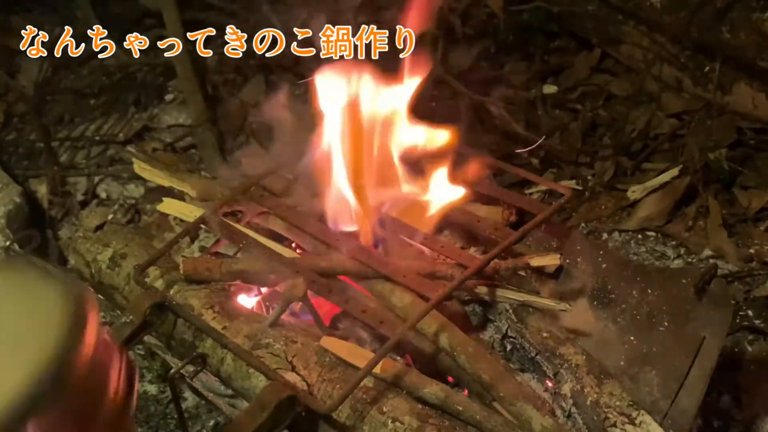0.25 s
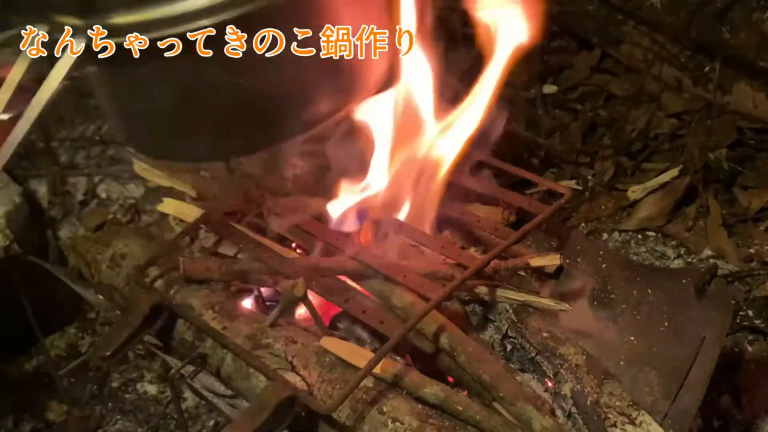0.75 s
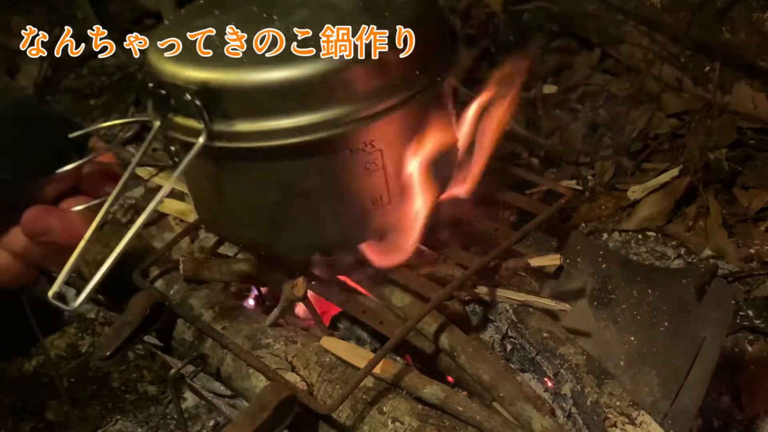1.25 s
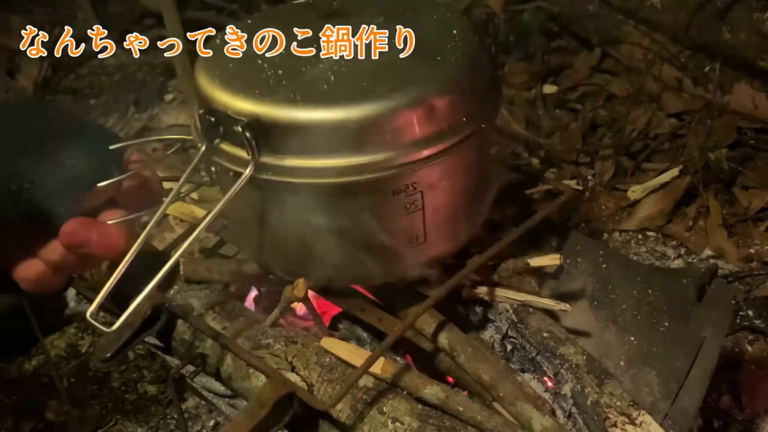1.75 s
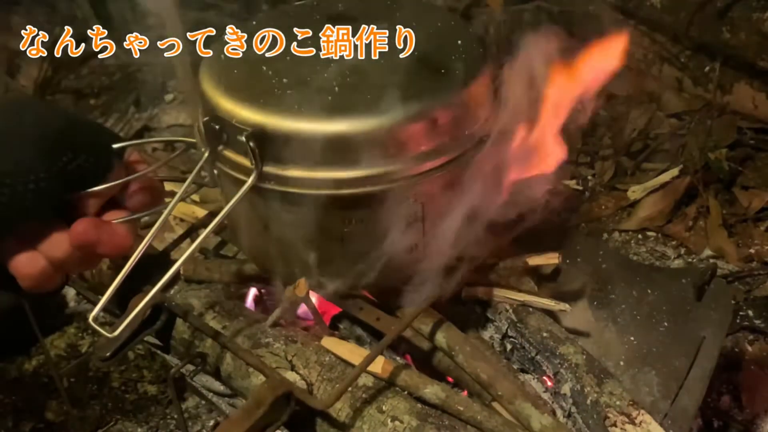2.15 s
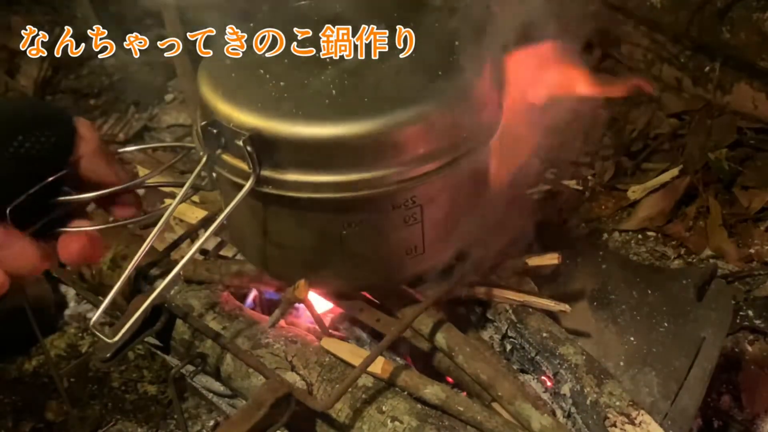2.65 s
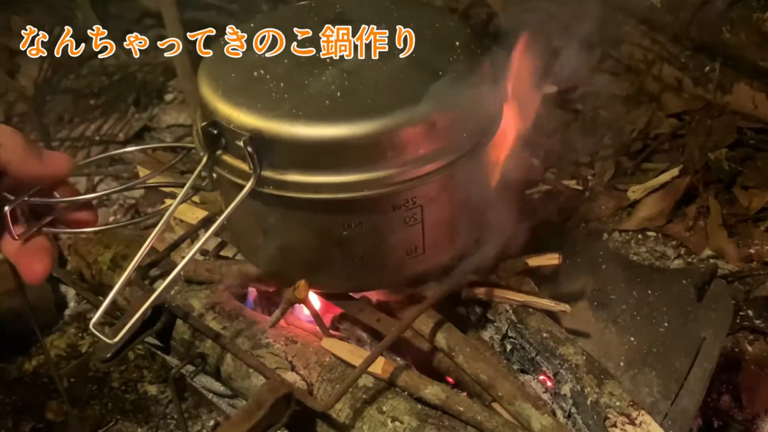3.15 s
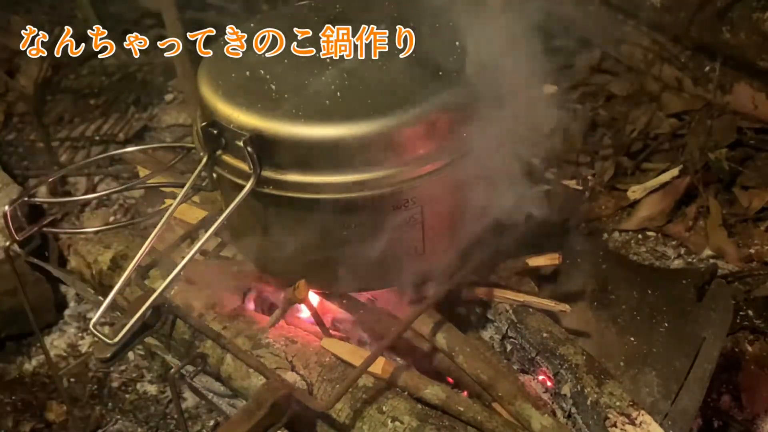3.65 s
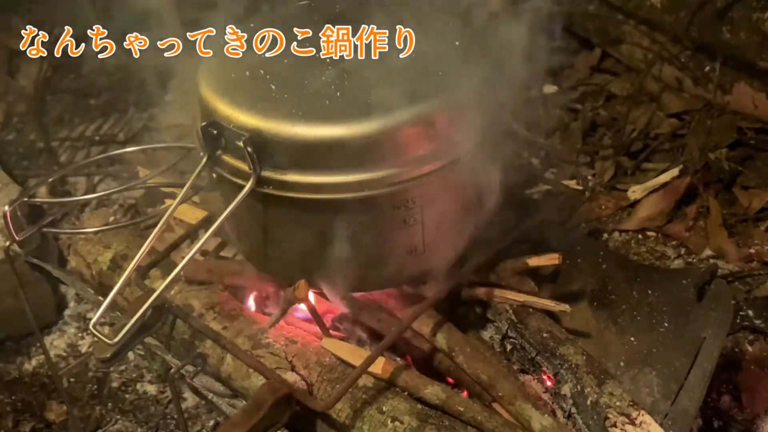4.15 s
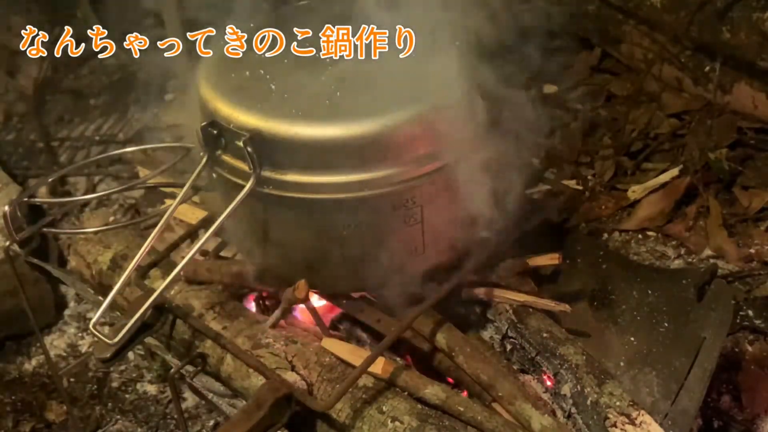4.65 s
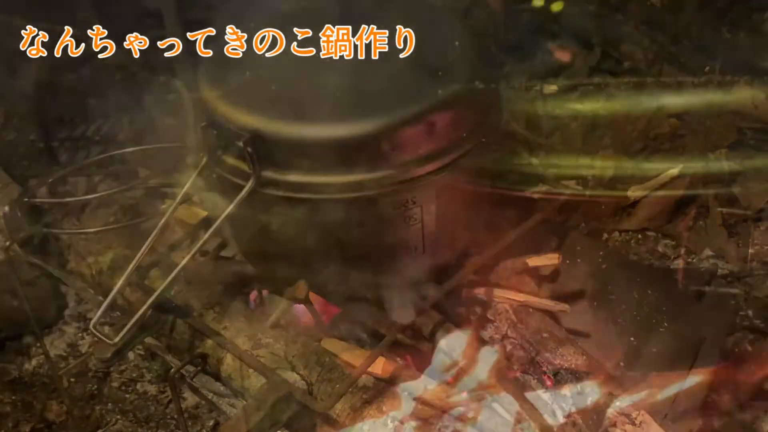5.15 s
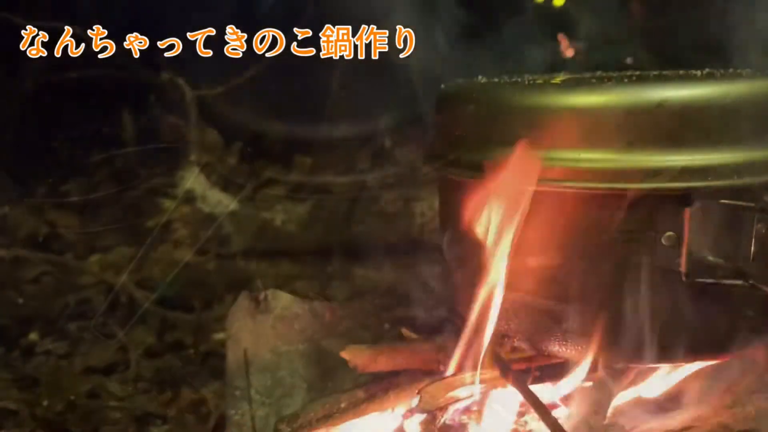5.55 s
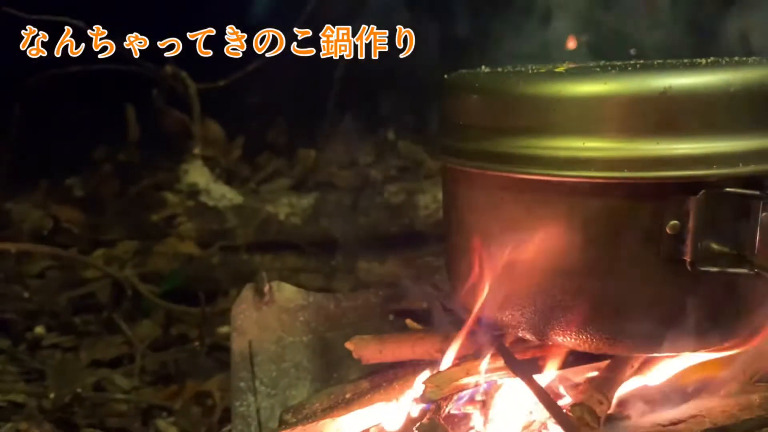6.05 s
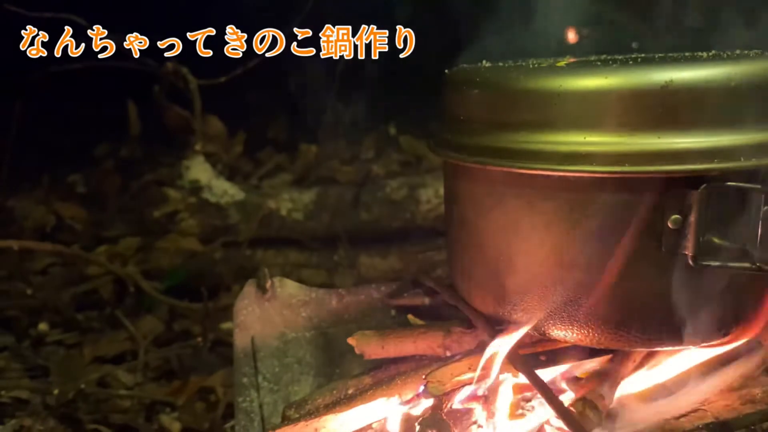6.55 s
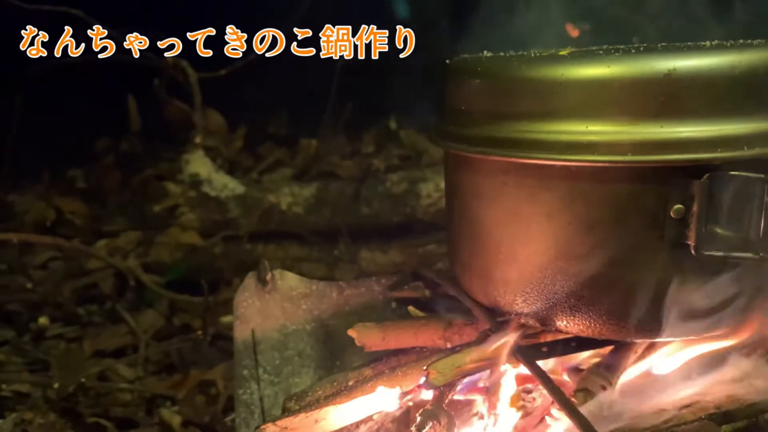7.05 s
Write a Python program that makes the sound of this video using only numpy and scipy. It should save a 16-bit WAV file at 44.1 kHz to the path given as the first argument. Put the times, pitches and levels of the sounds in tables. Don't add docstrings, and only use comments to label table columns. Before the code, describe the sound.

Outdoors at night, a small wood fire flutters low with sharp ember snaps, loudest at the very start. A metal pot touches the grate lightly, then settles with a short ring near two seconds. Crickets trill throughout over a faint stream on the left. Around five seconds wood knocks and the sound dissolves closer, with more sap hiss and another hard crack. Heard in stereo by a spaced microphone pair.

```python
import sys
import numpy as np
from scipy import signal
from scipy.fft import rfft, irfft
from scipy.io import wavfile
from scipy.ndimage import uniform_filter1d

SR = 44100
rng = np.random.default_rng(int(sys.argv[2]) if len(sys.argv) > 2 else 0)


def store_wav(level_fs):
    pcm = np.round(np.clip(np.atleast_2d(level_fs), -1, 1) * 32767)
    wavfile.write(sys.argv[1], SR, pcm.T.astype(np.int16))


def linear_from_db(decibels):
    return 10 ** (np.asarray(decibels, float) / 20)


N = 321930

FIRE_LAG, STREAM_LAG, BODY_LAG = 10.25, -20, -2


def evened(x):
    return x / np.sqrt(np.mean(x ** 2) + 1e-20)


def read(points, hz):
    f, value = np.transpose(points)
    return np.interp(np.log(hz + 1), np.log(f + 1), value)


def level(rows, axis=1):
    return linear_from_db(np.interp(np.arange(N) / SR, *np.transpose(rows)[[0, axis]]))


def add(mix, s, sound, pan_db, lag):
    for side, late in ((0, max(lag, 0)), (1, max(-lag, 0))):
        at = round(s * SR + late)
        part = mix[side, max(at, 0):][:max(len(sound) + min(at, 0), 0)]
        part += linear_from_db(pan_db * (.5 - side)) * sound[max(-at, 0):][:len(part)]


def noise(colour, same, lag, patchy_db, flicker_db, size):
    hz = np.fft.rfftfreq(size, 1 / SR)
    frames = 4 * N // size + 5
    a, b, c, d, patches = rng.standard_normal((frames, len(hz), 5)).T
    patches = uniform_filter1d(patches, size=8, axis=0)
    patches = evened(uniform_filter1d(patches, size=12, axis=1))
    flicker = evened(uniform_filter1d(rng.standard_normal(frames), size=3))
    same = np.clip(same * np.ones(len(hz)), 0, 1)[:, None]
    right = a + 1j * b
    delay = np.exp(-2j * np.pi * hz * lag / SR)[:, None]
    left = same * right * delay + np.sqrt(1 - same ** 2) * (c + 1j * d)
    gain_db = read(colour, hz)[:, None] + patchy_db * patches + flicker_db * flicker
    z = np.array([left, right]) * linear_from_db(gain_db)
    return evened(signal.istft(z, nperseg=size, noverlap=size - size // 4)[1][:, :N])


def band(x, lo_hz, hi_hz):
    sos = signal.butter(2, [lo_hz, min(hi_hz, 20000)], "band", fs=SR, output="sos")
    return signal.sosfilt(sos, x)


def fire_lag(hz):
    housing_turn_rad = 1.2
    return FIRE_LAG - housing_turn_rad * SR / (2 * np.pi * np.maximum(hz, 1000))


# (start [s], end [s])
DISSOLVE_S = (4.9, 5.65)


def spots(far_db, close_db):
    close = np.interp(np.arange(N) / SR, DISSOLVE_S, [0, 1])
    return np.hypot((1 - close) * linear_from_db(far_db), close * linear_from_db(close_db))


# (middle [s], half length [s], hiss [dB], roar [dB])
FLARES = [(0.067, 0.086, -59, -56.5), (1.197, 0.23, -92, -58.5), (1.904, 0.17, -77, -58.5),
          (3.67, 0.15, -70.5, -62.5), (4.2, 0.21, -71.5, -62.5), (4.492, 0.087, -59.5, -58.5),
          (5.057, 0.056, -82, -57), (5.303, 0.48, -72, -58), (5.577, 0.18, -65, -53),
          (6.33, 0.27, -66, -76), (6.776, 0.16, -68.5, -52), (7.04, 0.064, -71, -52)]


def flaring(steady, axis):
    t = np.arange(N) / SR
    power = steady ** 2
    for row in FLARES:
        power = power + linear_from_db(2 * row[axis]) * np.exp(-((t - row[0]) / row[1]) ** 2)
    return np.sqrt(power)


def leaves(x, t60):
    t = np.arange(round(.3 * SR)) / SR
    tail = rng.standard_normal((2, len(t))) * linear_from_db(-60 * t / t60)
    return signal.fftconvolve(x, tail / np.linalg.norm(tail[0]), axes=1)[:, :N]


# (time [s], vigour [dB], size as lean to deep puffing [dB])
FLAME = [(0, -45, 3.5), (.1, -42, -5), (.2, -46.5, 2), (.9, -44.5, -0.5), (1.6, -50, -3), (2.4, -47, -3),
         (2.62, -44.5, -0.5), (2.84, -42.5, -0.5), (3.2, -46.5, 1), (3.56, -43.5, -1), (3.85, -49.5, -2),
         (4.45, -47, 0.5), (5.25, -53, 0.9), (5.9, -46.5, 1.5), (6.3, -46, 1.5), (6.47, -55, -2),
         (6.78, -52, -5), (7.3, -49.5, -3)]
# (frequency [Hz], density [dB per Hz])
PUFF = [(20, -57), (40, 18.5), (55, 18), (80, 23), (100, 3), (140, -41.5)]
FLUTTER = [(55, -31), (85, -10), (110, 2), (170, -1.5), (220, -13.5), (300, -34), (500, -98)]
ROAR = [(120, -37), (200, 1.5), (240, 8.5), (330, 3), (420, 0), (700, -44)]


def flames():
    vigour, size = level(FLAME), level(FLAME, axis=2)
    puff = linear_from_db(-4) * vigour * size * noise(PUFF, .985, 0, 1.5, 1.2, size=4096)
    flutter = linear_from_db(-2.5) * vigour / size * noise(FLUTTER, 0.85, 0, 0.7, 2.6, size=2048)
    roar = flaring(spots(-60, -53.5), axis=3) * noise(ROAR, 0.22, 0, 1.7, 1.74, size=1024)
    return (puff + flutter) * linear_from_db([[-.6], [.6]]) + linear_from_db(-2.0) * roar


# (frequency [Hz], density [dB per Hz])
WASH = [(120, -12), (300, -9.5), (600, -0.5), (1200, 1), (2500, -5.5), (3600, -7.5), (5300, -11.5),
        (7500, -19), (10000, -25.5), (13500, -23.5), (15200, -10), (16000, -14)]
# (frequency [Hz], left-right likeness [0-1])
WASH_SAME = [(200, 0.086), (500, 0.32), (2000, 0.11), (5000, 0.038), (7000, 0.089), (9000, 1)]


def stream():
    hz = np.fft.rfftfreq(512, 1 / SR)
    lag = np.where(hz < 5500, STREAM_LAG, fire_lag(hz))
    wash = noise(WASH, read(WASH_SAME, hz), lag, 1.15, 0.3, size=512)
    return linear_from_db(3.5) * spots(-52, -52.5) * wash


# (frequency [Hz], density [dB per Hz])
SAP = [(2000, 1), (5000, 2.5), (6200, 1.5), (7200, 9.5), (8300, 12), (9300, 3.5), (11500, 6.5), (13500, 8),
       (15000, -14), (16000, -20)]


def sizzle():
    hiss = noise(SAP, 1.0, fire_lag(np.fft.rfftfreq(256, 1 / SR)), 2.8, 0.23, size=256)
    ticks_per_s = 250
    ticks = linear_from_db(6 * np.minimum(rng.exponential(1, N), 3))
    ticks = ticks * (rng.random(N) < ticks_per_s / SR) * rng.choice([-1, 1], N)
    ticks = band(band(ticks, 6500, 14000), 6500, 14000)
    ticks = linear_from_db(-11) * evened(ticks)
    ticks = np.array([np.roll(ticks, int(FIRE_LAG)), ticks])
    return linear_from_db(8.5) * flaring(spots(-82, -73), axis=2) * (hiss + ticks)


def trills(rows, uneven_db, stroke_s, sag_hz_per_s, swell_db, climb_strokes):
    out, t = np.zeros((2, N)), np.arange(-.024, .024, 1 / SR)
    bell = np.exp(-.5 * (t / stroke_s) ** 2)
    lucks = rng.standard_normal((len(rows), 3, 20))
    for (first, last, top_hz, climb_hz, db, pan_db), luck in zip(rows, lucks):
        times = np.linspace(first, last, round((last - first) / .048) + 1)
        for k, s in enumerate(times):
            hz = top_hz - climb_hz * np.exp(-k / climb_strokes) + 8 * luck[0, k]
            hz = hz - sag_hz_per_s * t
            stroke_db = db - swell_db * np.exp(-k / 0.73) + uneven_db * luck[1, k]
            tone = linear_from_db(stroke_db) * bell * np.sin(2 * np.pi * np.cumsum(hz) / SR)
            add(out, s + t[0], tone, pan_db + 0.59 * luck[2, k], 0)
    return out


# (frequency [Hz], density [dB per Hz])
FAR = [(3700, -27), (4050, -12.5), (4200, -6.5), (4300, -9), (4400, -11), (4600, -22), (4900, -18),
       (5200, -61)]


def chorus():
    start, length, pitch, high, pan = rng.random((168, 5)).T
    start = 7.8 * (np.arange(len(start)) + start) / len(start) - .5
    end = start + 0.18 + 0.21 * length
    higher = high > .87
    hz = 4170 + 170 * pitch + 280 * higher
    rows = list(zip(start, end, hz, 80 + 0 * hz, -11. * higher, 8 * pan - 4))
    far = sum(leaves(trills(rows[k::4], 3.5, .0045, 2000, 0, 1.5), .15) for k in range(4))
    shimmer = noise(FAR, 0.2, 0, 2.3, 0.44, size=1024)
    return spots(-60, -62.5) * (linear_from_db(4.0) * evened(far) + linear_from_db(3.0) * shimmer)


def strokes(rows, stroke_s, sag_hz_per_s, pan_db, lag):
    out, t = np.zeros((2, N)), np.arange(-.024, .024, 1 / SR)
    for (s, hz, db), luck in zip(rows, rng.standard_normal((len(rows), 2))):
        bell = np.exp(-.5 * (t / (stroke_s * linear_from_db(1.3 * luck[0]))) ** 2)
        tone = np.sin(2 * np.pi * np.cumsum(hz - sag_hz_per_s * t) / SR)
        add(out, s + t[0], linear_from_db(db) * bell * tone, pan_db + 1.5 * luck[1], lag)
    return out


# (time [s], pitch [Hz], peak [dB])
FAR_STROKES = [(0.023, 4300, -42), (0.107, 4320, -45), (0.176, 4350, -50), (0.372, 4240, -43),
               (0.462, 4280, -39), (0.51, 4290, -43), (0.559, 4300, -43), (0.61, 4240, -44),
               (0.631, 4260, -48), (0.667, 4320, -46), (0.776, 4230, -56), (0.829, 4200, -52),
               (0.964, 4230, -46), (1.019, 4240, -42), (1.06, 4290, -48), (1.117, 4280, -45),
               (1.165, 4280, -43), (1.22, 4280, -41), (1.243, 4240, -52), (1.287, 4200, -50),
               (1.582, 4270, -46.5), (1.629, 4316, -39), (1.679, 4260, -46), (1.732, 4290, -42.5),
               (1.777, 4310, -40), (2.12, 4240, -49), (2.193, 4200, -46), (2.222, 4300, -42),
               (2.275, 4300, -42), (2.325, 4290, -46), (2.624, 4180, -47), (2.663, 4250, -47),
               (2.721, 4250, -40.5), (2.77, 4260, -41.5), (2.818, 4260, -42), (2.867, 4190, -48),
               (2.911, 4290, -42.5), (3.246, 4220, -47), (3.3, 4270, -43), (3.349, 4300, -40.5),
               (3.393, 4260, -43), (3.45, 4270, -46), (3.615, 4300, -46), (3.697, 4290, -45.5),
               (3.739, 4250, -49.5), (3.819, 4230, -45.5), (3.847, 4260, -44), (3.883, 4300, -42),
               (3.934, 4290, -45), (3.979, 4310, -45.5), (4.363, 4270, -42.5), (4.41, 4290, -45.5),
               (4.463, 4290, -43), (4.51, 4300, -42), (4.635, 4320, -47), (4.752, 4270, -48),
               (4.796, 4260, -48), (4.901, 4290, -45), (4.948, 4240, -47), (4.99, 4270, -49)]
CLOSE_STROKES = [(5.122, 4200, -54), (5.391, 4320, -53), (5.442, 4290, -46), (5.487, 4430, -51),
                 (5.53, 4300, -49), (5.546, 4140, -54), (5.58, 4400, -55), (5.626, 4360, -50),
                 (5.672, 4420, -50), (5.717, 4250, -48), (5.771, 4280, -48), (5.815, 4270, -50),
                 (5.857, 4400, -48), (5.877, 4400, -60), (5.902, 4430, -45), (5.95, 4380, -51),
                 (5.998, 4360, -45), (6.042, 4180, -52), (6.258, 4220, -44), (6.306, 4200, -49),
                 (6.355, 4290, -49), (6.393, 4340, -45), (6.473, 4160, -51), (6.492, 4320, -43),
                 (6.535, 4400, -46), (6.579, 4400, -51), (6.632, 4280, -43), (6.681, 4280, -49),
                 (6.697, 4130, -52), (6.717, 4160, -51), (6.719, 4380, -54), (6.76, 4220, -51),
                 (6.814, 4200, -50), (6.9, 4160, -55), (6.957, 4310, -45), (6.976, 4160, -53),
                 (7.007, 4280, -47), (7.054, 4260, -49), (7.097, 4380, -48), (7.143, 4370, -48),
                 (7.188, 4400, -44), (7.24, 4350, -49), (7.253, 4160, -57), (7.281, 4350, -50)]


def near_crickets():
    far = strokes(FAR_STROKES, .007, 1500, -4, lag=-1)
    close = strokes(CLOSE_STROKES, .008, 2500, 3, lag=4)
    return linear_from_db(-1.5) * (far + close)


# (time [s], peak [dB], pitch [Hz], left-right [dB])
RINGS = [
    (.024, -46, 567, 5),
    (.132, -44, 585, 6),
    (.21, -43.5, 553, 6),
    (1.42, -46, 1700, -1),
    (1.919, -35.5, 572, 4),
    (1.92, -42, 657, -5),
    (1.917, -46, 790, 3),
]
# (time [s], peak [dB], first pitch [Hz], t60 [s], left-right [dB])
TAPS = [
    (.058, -33, 1050, 0.019, 16),
    (1.744, -35, 1490, .028, 3),
    (3.498, -41, 4400, 0.054, -3),
    (3.924, -37, 298, 0.034, -10),
    (4.9615, -30, 750, .03, 8),
]
# (time [s], peak [dB], first pitch [Hz], t60 [s], left-right [dB])
THUDS = [
    (.09, -38, 213, 0.16, 0),
    (5.422, -46, 400, 0.032, -3),
]
# (time [s], peak [dB], first pitch [Hz], last pitch [Hz], t60 [s], left-right [dB])
SLOSH = (1.95, -44, 774, 1300, .36, 4)


def knocks():
    out = np.zeros((2, N))
    ring_t60_s = 0.074
    rows = [(s, db, hz, hz, ring_t60_s, pan_db) for s, db, hz, pan_db in RINGS] + [SLOSH]
    for hits, fall in ((TAPS, 0.803), (THUDS, 0.484)):
        rows += [(s, db, hz, fall * hz, t60, pan_db) for s, db, hz, t60, pan_db in hits]
    for s, db, first_hz, last_hz, t60, pan_db in rows:
        t = np.arange(round(t60 * SR)) / SR
        hz = last_hz + (first_hz - last_hz) * np.exp(-t / (0.19 * t60))
        envelope = linear_from_db(db - 60 * t / t60) * (1 - np.exp(-t / 0.002))
        add(out, s, envelope * np.sin(2 * np.pi * np.cumsum(hz) / SR), pan_db, STREAM_LAG)
    return out


# (time [s], peak [dB], body [dB], middle [dB], top [dB])
SNAPS = [(.0258, -29, -19, -18, 1), (.0874, 2.5, -7.5, -5.5, -10), (.088, -9, -20, 2, -16),
         (0.109, -27, -20, -8, 0), (0.2155, -31, -14, 4.5, 6), (.3601, -15, -22, -10.5, -1),
         (1.245, -44, -14, -4, 13), (1.3712, -31.5, -14, 0, -12), (1.7565, -32, -14, -8, 0),
         (1.761, -23.5, -11, -1, 1), (1.8028, -37, -14, -8, 0), (1.912, -37, -14, 0, 3),
         (2.627, -38, -14, 4, 1), (2.913, -33.5, -14, 6, 4), (3.6093, -27, -14, -2, -2),
         (3.7662, -34, -16, 3, -15), (4.538, -39, -14, 0, -6), (4.542, -29, -14, -1, -3),
         (4.7897, -41, -14, 2, 5), (5.421, -21.5, -4, -8, -8), (5.5338, -43, -14, -5, 0),
         (5.609, -30, -13, -5, 4), (5.658, -33, -14, -12, -1), (5.676, -35, -14, -7, 3),
         (6.0366, -35, -14, -2, 5), (6.146, -36, -14, -8, -8), (6.1773, -32, -14, -14, -8),
         (6.2347, -37, -14, -8, -3), (6.247, -36, -14, -8, -8), (6.303, -29.5, -14, -17, -7),
         (6.322, -39, -14, -8, -3), (6.4077, -35, -14, -6, -3), (6.4531, -4.5, -15, -5, -3),
         (6.6136, -16.5, -4.5, -4.5, -2), (6.7755, -31, -2, 0, 0), (6.8597, -29.5, -14, -14, -4),
         (7.2834, -23.5, -16.5, -9, -5)]
SNAP_HZ = [400, 1200, 4300, 6500, 7800, 9300, 11500, 13200, 15200, 16200, 16800]


def snaps():
    splinter, splinter_s = .4, 0.0002
    scatter, scatter_s = 0.055, 0.002
    out, t = np.zeros((2, N)), np.arange(1024) / SR - .002
    hz = np.fft.rfftfreq(len(t), 1 / SR)
    treble = np.clip((hz - 4500) / 1500, 0, 1)
    turns = treble * (hz * fire_lag(hz) / SR - 1) + (1 - treble) * hz * BODY_LAG / SR
    tear = splinter * np.exp(-abs(t) / splinter_s * np.where(t > 0, 1, 1.2))
    echo = (t > 0) * scatter * np.exp(-t / scatter_s)
    lucks = rng.standard_normal((len(SNAPS), 3, len(t)))
    for (s, db, body_db, middle_db, top_db), luck in zip(SNAPS, lucks):
        colour_db = np.interp(hz, SNAP_HZ, [
            body_db - 6, body_db, middle_db - 5, middle_db, middle_db - 1, 0, -3,
            top_db - 1, top_db, top_db - 8, -90])
        for side in (0, 1):
            click = (abs(t) == abs(t).min()) + tear * luck[2]
            click = rfft(click + echo * luck[side])
            click = click / uniform_filter1d(abs(click), size=41)
            click = click * np.exp(-2j * np.pi * turns * (1 - side))
            part = out[side, round((s - .0009) * SR):][:len(t)]
            part += linear_from_db(db + 11.5) * irfft(click * linear_from_db(colour_db))[:len(part)]
    return out


# (first stroke [s], last stroke [s], level [dB])
HIGH_TRILLS = [(.1, .152, -49), (.42, .612, -51), (1.06, 1.256, -54), (1.64, 1.83, -59), (2.195, 2.34, -49),
               (2.913, 3.04, -54), (3.62, 3.79, -52), (4.316, 4.46, -52), (5.307, 5.453, -51),
               (5.72, 5.99, -50.5), (6.171, 6.411, -48), (6.713, 6.908, -49), (7.165, 7.3, -49)]
# (top pitch [Hz], climb [Hz], left-right [dB])
HIGH_VOICE = (4885, 25, -5)


def high_cricket():
    top_hz, climb_hz, pan_db = HIGH_VOICE
    rows = [(first, last, top_hz, climb_hz, db, pan_db) for first, last, db in HIGH_TRILLS]
    return linear_from_db(-9.5) * trills(rows, 2.5, .011, 1500, 5, 1.5)


# (time [s], peak [dB], first pitch [Hz], length [s], left-right [dB])
BUMPS = [(1.743, -41, 1500, 0.0067, 0), (1.752, -41, 1200, 0.006, 1), (4.433, -39, 1900, 0.0074, 5),
         (4.502, -43, 1500, .007, 4), (4.563, -37, 1500, 0.0077, 3), (4.597, -38.5, 1050, 0.0097, -1),
         (4.9592, -24.5, 1080, 0.0099, 6.5), (4.98, -37, 302, .014, -1), (5.044, -42, 900, .009, 4),
         (5.056, -45, 1210, 0.011, 4), (5.068, -44, 1300, .007, 0), (5.081, -43, 1510, 0.0089, 2),
         (5.092, -42, 1400, 0.0091, 2), (5.095, -46, 1390, 0.0065, -10), (5.108, -44, 1110, .008, 6)]


def bumps():
    out = np.zeros((2, N))
    fall = 0.21
    for s, db, first_hz, length, pan_db in BUMPS:
        u = np.arange(round(length * SR)) / (length * SR)
        hz = first_hz * (fall + (1 - fall) * np.exp(-u / 0.15))
        envelope = -linear_from_db(db) * np.sin(np.pi * u ** 0.34) ** 0.86
        add(out, s, envelope * np.sin(2 * np.pi * np.cumsum(hz) / SR), pan_db, STREAM_LAG)
    return out


# (middle [s], half length [s], level [dB])
RUSTLES = [
    (1.75, 0.015, -47.5),
    (3.6, 0.054, -52.5),
    (4.47, 0.14, -52),
    (5.422, 0.018, -54),
]
# (frequency [Hz], density [dB per Hz])
LEAF = [(300, -3), (900, -1.5), (2200, -0.5), (3500, -7), (6000, -28), (9000, -58)]


def rustle():
    t = np.arange(N) / SR
    gain = sum(linear_from_db(db) * np.exp(-.5 * ((t - s) / half) ** 2) for s, half, db in RUSTLES)
    return gain * noise(LEAF, 0.12, 0, 3.6, 1.2, size=256)


def scene():
    edge = signal.firwin(401, 16100, fs=SR)[None]
    hiss = signal.oaconvolve(stream() + sizzle(), edge, "same", axes=1)
    high = high_cricket()
    near = near_crickets() + high
    near = near + linear_from_db(-8) * leaves(near, .15) + linear_from_db(-1) * leaves(high, .2)
    hits = knocks()
    hits = hits + linear_from_db(-3.5) * leaves(hits, 0.095)
    return flames() + hiss + chorus() + near + hits + snaps() + bumps() + rustle()


def roll_off(x):
    return signal.sosfilt(signal.butter(12, 16600, fs=SR, output="sos"), x)


def record(dry):
    cut = signal.sosfilt(signal.butter(4, 40, "high", fs=SR, output="sos"), dry)
    held = .9 * np.tanh(cut / .9)
    mix = signal.oaconvolve(held, signal.firwin(301, 16650, fs=SR)[None], "same", axes=1)
    return roll_off(mix)


dry = scene()
out = record(dry)
store_wav(out)
```